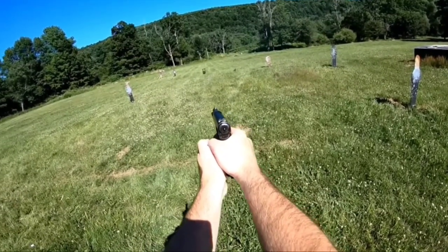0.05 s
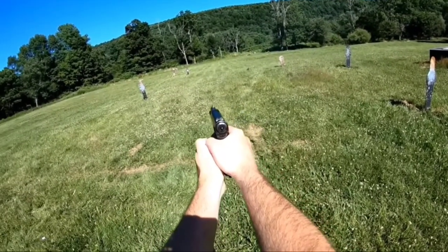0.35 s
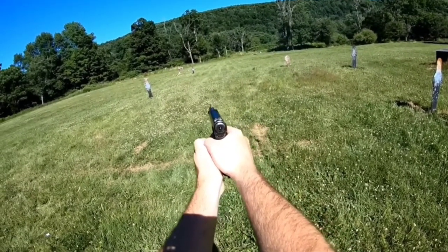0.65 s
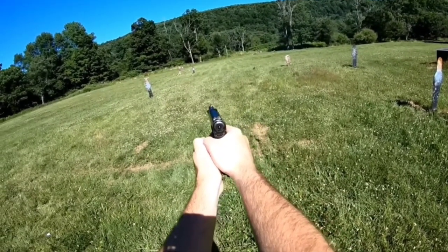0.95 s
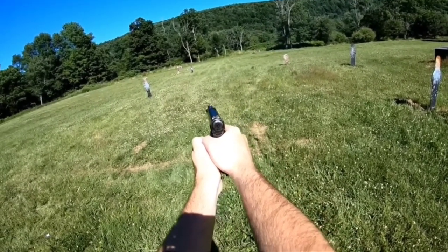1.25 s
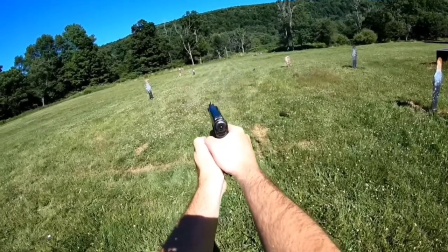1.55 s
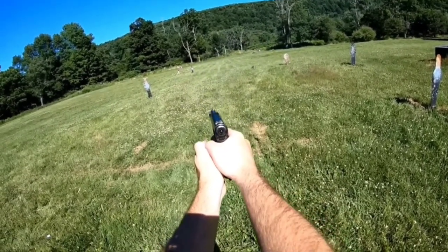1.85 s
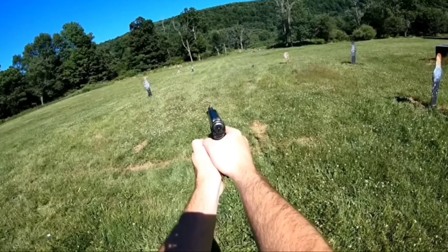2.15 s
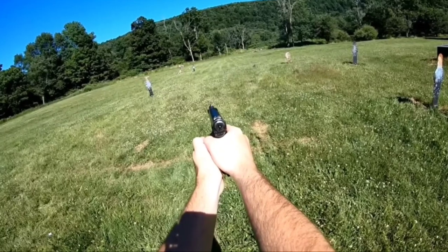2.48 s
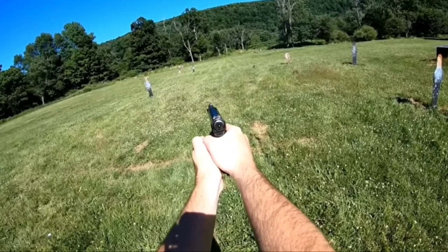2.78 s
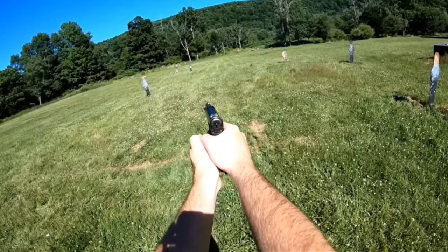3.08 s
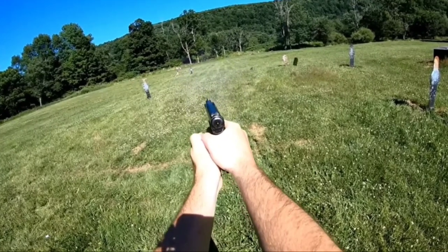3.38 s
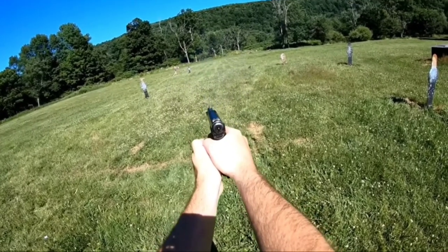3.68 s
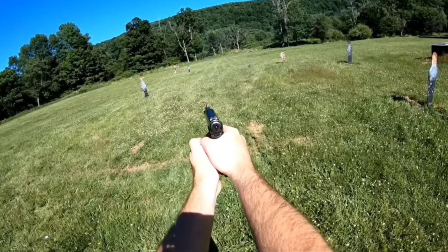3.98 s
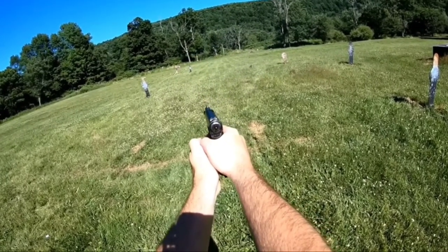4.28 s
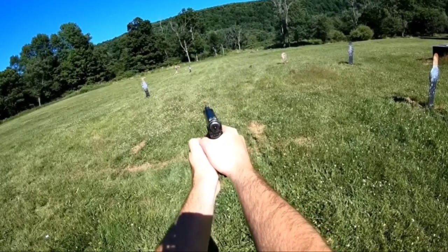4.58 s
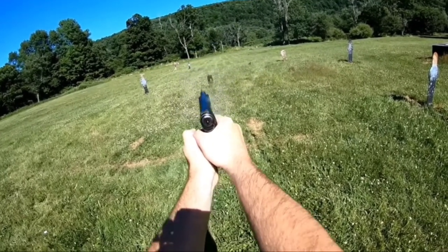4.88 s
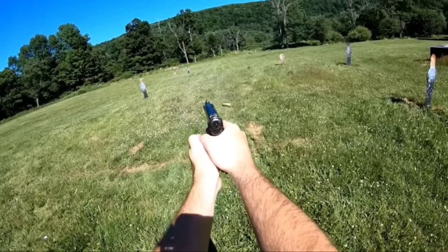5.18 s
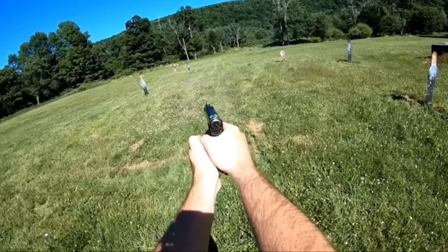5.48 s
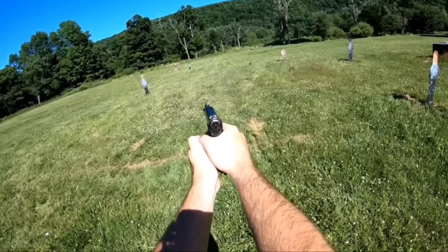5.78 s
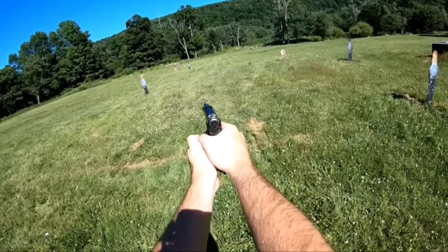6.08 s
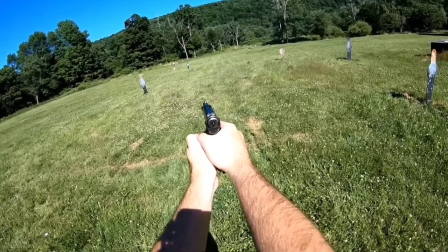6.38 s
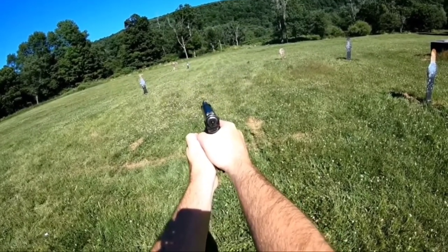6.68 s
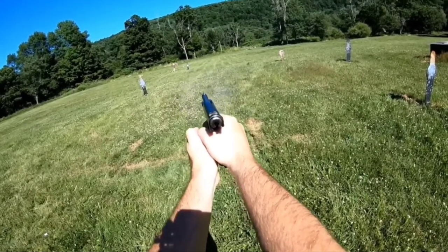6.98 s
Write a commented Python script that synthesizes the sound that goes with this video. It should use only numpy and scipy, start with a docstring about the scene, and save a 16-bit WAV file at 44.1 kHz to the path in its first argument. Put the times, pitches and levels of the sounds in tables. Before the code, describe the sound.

After a brief metallic rattle, a close handgun fires four evenly spaced, echoing shots outdoors, two of them ringing a steel target.

```python
"""Pistol shots in a field

Four shots in a mown field ringed by woods, heard from the shooter's head. A bright metallic rattle
comes first; each blast overloads the microphone, the slide cycles, and field and trees echo. Bullets
kick the soil and two clang on a steel plate. Gain control ducks at every shot and lets the echoes, the
breeze and a far engine swell back."""
import sys
import numpy as np
from scipy import signal
from scipy.fft import rfft, irfft
from scipy.io import wavfile
from scipy.ndimage import uniform_filter1d, minimum_filter1d

SR = 44100
rng = np.random.default_rng(int(sys.argv[2]) if len(sys.argv) > 2 else 0)


def output_pcm(signal):
    """Save a mono or channel-first signal as 16-bit PCM at the path in sys.argv[1].

    Samples are clipped to [-1, 1] before scaling.
    """
    pcm = np.clip(np.atleast_2d(signal).T, -1, 1) * 32767
    wavfile.write(sys.argv[1], SR, np.round(pcm).astype(np.int16))


N = 319725
OVERLOAD_DB = 22


def amp(db):
    return 10 ** (np.asarray(db) / 20)


def unit_rms(x):
    return x / np.sqrt(np.mean(x ** 2) + 1e-20)


def seconds(length_s):
    return np.arange(int(length_s * SR)) / SR


def add(mix, start_s, sound):
    part = mix[max(round(start_s * SR), 0):][:len(sound)]
    part += sound[:len(part)]


def colour(x, spectrum):
    """Filters x by (Hz, dB) points; the result has rms 1."""
    hz, db = np.transpose(spectrum)
    bin_hz = np.fft.rfftfreq(len(x), 1 / SR)
    gain = amp(np.interp(np.log(bin_hz + 1), np.log(hz), db))
    return unit_rms(irfft(rfft(x) * gain, len(x)))


def noise(spectrum, t):
    return colour(rng.standard_normal(len(t)), spectrum)


def burst(spectrum, decay_s):
    t = seconds(1)
    return noise(spectrum, t) * np.exp(-t / decay_s)


def knocks(t, depth_db):
    """A level that jumps every few milliseconds, as loose parts knock."""
    jitter = unit_rms(uniform_filter1d(rng.standard_normal(len(t)), size=90))
    return unit_rms(amp(depth_db * jitter))


# Each row: frequency in Hz, relative level in dB.
WIND_SPECTRUM = [(5, -8.5), (28, 6), (55, -4.5), (82, -1), (120, -9.5), (170, -21), (300, -27),
                 (700, -61.5)]
# Each row: peak time in seconds, boost in dB.
WIND_GUSTS = [(3.149, 5.5), (4.8, 4), (6.65, 6.5)]

def wind(t, buffet, start_db=-38, freshen_db_per_s=0.79, gust_width_s=0.34, buffet_db=4):
    """A freshening, gusty breeze buffets the microphone."""
    gusts_db = sum(db * np.exp(-((t - peak_s) / gust_width_s) ** 2) for peak_s, db in WIND_GUSTS)
    level_db = start_db + freshen_db_per_s * t + gusts_db + buffet_db * buffet
    return amp(level_db) * noise(WIND_SPECTRUM, t)


# Each row: frequency in Hz, relative level in dB.
WOODS_SPECTRUM = [(100, -20.5), (180, -4.5), (300, -4.5), (550, 2), (950, 2), (1400, -2), (2000, -9.5),
                  (3000, -17), (4500, -26.5), (7000, -35), (11000, -40), (15500, -43)]

def woods(t, sway, level_db=-37.5, sway_db=0.5):
    """A near-steady wash from the woods."""
    return amp(level_db + sway_db * sway) * noise(WOODS_SPECTRUM, t)


def engine(t, sway, drift, start_hz=305.4, sag_hz_per_s=5, level_db=-43.5, nearest_s=5.26, pass_s=1.0):
    """A far engine drones on two harmonics, slows steadily and is loudest as it passes."""
    hz = (start_hz - sag_hz_per_s * t) * (1 + 0.012 * drift)
    phase = 2 * np.pi * np.cumsum(hz) / SR
    drone = np.sin(phase) + amp(-3) * np.sin(2 * phase)
    relative_distance = np.hypot(1, (t - nearest_s) / pass_s)
    return amp(level_db + 2 * sway) / relative_distance * drone


# Each row: frequency in Hz, relative level in dB.
RATTLE_SPECTRUM = [(500, -5), (1700, -2.5), (4500, 4), (5350, -6), (5680, 10.5), (6000, 0), (7200, 3.5),
                   (8700, -2), (9000, -2), (10400, -9), (11500, -17), (15500, -18)]
# Each row: start in seconds, level in dB, rise in seconds, decay in seconds.
METAL_RATTLES = [(0.0, -41.5, .003, 0.16), (0.049, -38, .003, 0.055), (.132, -31.5, .012, 0.04),
                 (.528, -51, .006, 0.02), (.868, -55, .008, 0.019), (.985, -46, .02, 0.045)]

def metal_rattles(mix):
    """A bright metallic rattle and its fading echo open the scene."""
    t = seconds(1)
    for start_s, db, rise_s, decay_s in METAL_RATTLES:
        rattle = burst(RATTLE_SPECTRUM, decay_s) * knocks(t, depth_db=3)
        add(mix, start_s, amp(db) * np.minimum(t / rise_s, 1) * rattle)


# Each row: frequency in Hz, relative level in dB.
CRACK_SPECTRUM = [(200, -13.5), (700, -3.5), (1400, -11), (2400, -4.5), (2900, 1), (3300, -9.5),
                  (3850, 2.5), (4800, -10.5), (5700, -2), (7000, -7.5), (9500, -7), (15500, -14)]
# Reflections off hands, arms and chest. Each row: delay in seconds, relative height, width in seconds.
BODY_SLAPS = [(.0041, 0.86, 0.000075), (.0051, 1, 0.000032), (.0058, .4, .00004), (.0075, 0.81, 0.00006)]

def blast(crack_db, decay_s, slap_db, bounce_s, leak_hz=0.62):
    """Muzzle crack with its body and ground reflections, in units of the overload point."""
    t = seconds(1.8)
    crack = amp(crack_db) * noise(CRACK_SPECTRUM, t) * np.exp(-t / decay_s)
    slaps = sum(height * np.exp(-((t - at_s) / width_s) ** 2) for at_s, height, width_s in BODY_SLAPS)
    ground = 0.78 * np.exp(-((t - bounce_s) / 0.00042) ** 2)
    # The microphone is pinned to one side, then swings back far below the audible range.
    swing = -7.4 * np.exp(-t / 0.026) * np.sin(np.pi * (0.031 - t) / 0.128)
    pinned = 1.083 * np.tanh(np.minimum(swing, 0)) + np.maximum(swing, 0)
    pinned *= np.minimum(t / 0.0021, 1)
    leak = signal.butter(1, leak_hz, "high", fs=SR)
    return crack + amp(slap_db) * slaps + ground + signal.lfilter(*leak, pinned)


# Each row: frequency in Hz, relative level in dB.
SLIDE_SPECTRUM = [(100, 11.5), (400, 0), (1200, -70.5), (3000, 7.5), (7000, 7), (10000, 6.5), (15500, -27)]

def slide(clack_db=5, clack_s=0.028, rattle_db=-7, rattle_s=0.026, rattle_decay_s=0.068):
    """The slide slams home and its parts rattle on."""
    t = seconds(0.65)
    clack = amp(clack_db) * np.exp(-(t - clack_s) / 0.0025) * (t > clack_s)
    rattle = amp(rattle_db) * knocks(t, depth_db=2.5) * np.exp(-abs(t - rattle_s) / rattle_decay_s)
    rattle *= np.interp(t, [0.01, 0.024, rattle_s], [0, 0.15, 1])
    return noise(SLIDE_SPECTRUM, t) * (clack + rattle)


# Each row: start in seconds, crack level in dB over overload, crack decay in seconds,
# body slap gain in dB, ground bounce delay in seconds, slide gain in dB.
PISTOL_SHOTS = [(1.3709, 19, 0.0014, 9, 0.0092, -1.5), (3.2429, 27, 0.00082, -2, 0.0095, 0),
                (4.973, 21, 0.00084, -5, 0.00877, -1), (6.8737, 18.5, 0.00098, -1.5, 0.0095, -1)]

def pistol(mix, echo):
    """Each shot blasts, cycles the slide and raises the same echo."""
    for start_s, crack_db, decay_s, slap_db, bounce_s, slide_db in PISTOL_SHOTS:
        add(mix, start_s, amp(OVERLOAD_DB) * blast(crack_db, decay_s, slap_db, bounce_s))
        add(mix, start_s, amp(slide_db) * slide())
        add(mix, start_s, echo)


# Each row: frequency in Hz, relative level in dB.
SCATTER_SPECTRUM = [(60, -28.5), (200, -26.5), (330, -12.5), (480, -4.5), (900, 2), (1300, 2.5),
                    (1900, -6.5), (3600, -11), (7000, -17), (10000, -21.5), (12000, -30), (16000, -25)]
# Grass underfoot, slope, far meadow, edge of the woods, hillside.
# Each row: peak delay in seconds, level in dB, rise in dB per second, fade in dB per second.
TERRAIN = [(.029, -1, 1000, 602), (.063, 1.2, 800, 189), (.24, -20.5, 60, 30), (.345, -12.5, 280, 38),
           (.5, -14.5, 150, 33)]

def scatter(t, grain_db=2.5, ridge_s=0.9, ridge_db_per_s=25):
    """Stretches of land return grainy noise and their powers add; little comes from beyond the ridge."""
    grains = rng.standard_normal(len(t)) * amp(grain_db * np.minimum(rng.exponential(1, len(t)), 5))
    power = sum(amp(db + np.minimum(rise * (t - peak_s), fade * (peak_s - t))) ** 2
                for peak_s, db, rise, fade in TERRAIN)
    ridge_shadow = amp(-ridge_db_per_s * np.maximum(t - ridge_s, 0))
    return colour(grains, SCATTER_SPECTRUM) * np.sqrt(power) * ridge_shadow


def trunks(count=6, near_s=0.38, far_s=0.98, near_db=-2.5, fade_db_per_s=26, centre_hz=2200):
    """Reflector rows for randomly placed trunks; the farther, the fainter."""
    place, tone = rng.random((count, 2)).T
    depth_s = (far_s - near_s) * (np.arange(count) + place) / count
    return list(zip(near_s + depth_s, near_db - fade_db_per_s * depth_s, centre_hz * 2 ** (tone - 0.5)))


# Plates and the tree line. Each row: delay in seconds, level in dB, centre frequency in Hz.
FIELD_REFLECTORS = [(.0615, 0, 2400), (.0885, 1, 1800), (.1545, 9, 2900), (.1738, -3, 3300),
                    (.474, -1, 800), (.4875, 2, 900), (.612, -4, 1200)]

def field_echo(patch_db=1.82, air_db_per_s=26):
    """The landscape returns a shot as scatter and a few sharp slaps."""
    t = seconds(1.5)
    echo = scatter(t)
    for delay_s, db, centre_hz in FIELD_REFLECTORS + trunks():
        cycles = (t - delay_s) * centre_hz
        echo += amp(db) * np.cos(2 * np.pi * cycles) * np.exp(-2 * cycles ** 2)
    hz, path_s, bins = signal.stft(echo, SR, nperseg=256)
    # Each clump of trees returns its own patch of the spectrum.
    patches = uniform_filter1d(rng.standard_normal(bins.shape), size=4, axis=0)
    patches = unit_rms(uniform_filter1d(patches, size=3, axis=1))
    air_loss_db = air_db_per_s * path_s * (hz[:, None] / 10000) ** 1.1
    return signal.istft(bins * amp(patch_db * patches - air_loss_db), nperseg=256)[1]


# Lead striking soil or steel. Each row: frequency in Hz, relative level in dB.
SPLASH_SPECTRUM = [(300, -39), (1600, -22), (2500, -5), (5000, -2), (8000, -3.5), (11000, -8), (15500, -15)]
# Each row: start in seconds, level in dB, decay in seconds.
SOIL_HITS = [(1.5914, -16.5, .004), (3.469, -21, .002), (5.185, -20, .002), (7.0572, -12.5, 0.0033)]

def soil_hits(mix):
    """Bullets and fragments kick the soil."""
    for start_s, db, decay_s in SOIL_HITS:
        add(mix, start_s, amp(db) * burst(SPLASH_SPECTRUM, decay_s))


# Each row: frequency in Hz, T60 in seconds, level in dB for a centre strike, level in dB for a rim strike.
PLATE_MODES = [(1740, 0.44, -17, -31), (2230, 0.72, -14.5, -17), (2490, 0.35, -9, -2.5),
               (2615, 0.43, -21, 0.5), (2860, 0.26, -8, 1), (3130, 0.28, -5, -21), (2940, 0.34, -24, -11),
               (3541, 0.22, -5, -18), (3730, 0.18, -16, -4), (4160, 0.27, -25, -19), (4340, .25, -25, -15),
               (4350, .25, -24, -15), (4360, 0.23, -14, -14), (4540, 0.36, -24, -10), (4978, 0.13, -20, 5),
               (5300, 0.22, -13, -0.5), (5670, 0.16, 6, -9), (5824, 0.19, -6, -12), (6000, 0.51, -15, -8),
               (6487, 0.33, -27, -11), (7750, .2, -27, -27), (9618, 0.52, -25, -21), (9860, 0.099, -8, -4),
               (11850, .2, -29, -13)]

def plate_ring(spot, twin_gain=0.35, split_hz=38, clank_db=-18, clank_t60_s=0.15):
    """The strike spot sets the level of each steel mode; a weaker twin makes the mode beat."""
    t, ring = seconds(1), 0
    for hz, t60_s, centre_db, rim_db in PLATE_MODES:
        phase, twin_phase, split = rng.random(3)
        twin_hz = hz + split_hz * (2 * split - 1)
        mode = np.sin(2 * np.pi * (hz * t + phase))
        twin = twin_gain * np.sin(2 * np.pi * (twin_hz * t + twin_phase))
        ring += amp(centre_db + spot * (rim_db - centre_db) - 60 * t / t60_s) * (mode + twin)
    # Short-lived modes of plate and hanger make the clank.
    for place, phase in rng.random((40, 2)):
        hz = 2200 * 5 ** place
        ring += amp(clank_db - 60 * t / clank_t60_s) * np.sin(2 * np.pi * (hz * t + phase))
    return ring


# Each row: start in seconds, ring gain in dB, splash gain in dB, strike spot from 0 (centre) to 1 (rim).
PLATE_HITS = [(3.4250, -7.5, 3.5, 0.036), (5.1564, -7.5, 2.5, 0.75)]

def plate_hits(mix, echo, echo_db=-11):
    """Lead splashes on the plate, the steel rings, and the edge of the woods returns the clang."""
    delay_s = np.arange(len(echo)) / SR
    woods_edge = echo * (delay_s > 0.2) * np.exp(-delay_s / 0.11)
    woods_edge /= np.linalg.norm(woods_edge)
    for start_s, ring_db, splash_db, spot in PLATE_HITS:
        ring = amp(ring_db) * plate_ring(spot)
        tick = burst(SPLASH_SPECTRUM, decay_s=0.0012)
        shimmer = amp(-15) * burst(SPLASH_SPECTRUM, decay_s=0.03)
        clang = ring + amp(splash_db) * (tick + shimmer)
        add(mix, start_s, clang)
        carry = amp(echo_db - 10 * spot)  # a square hit carries farthest
        add(mix, start_s, carry * signal.fftconvolve(clang, woods_edge))


def scene(port_db=-31):
    """Shots, steel and rattles in the open air, nearly the same in both ears."""
    t = np.arange(N) / SR
    slow_spectrum = [(1, 0), (5, -3), (20, -28), (60, -100)]
    buffet, sway, drift = (noise(slow_spectrum, t) for _ in range(3))
    mix = wind(t, buffet) + woods(t, sway) + engine(t, sway, drift)
    echo = field_echo()
    pistol(mix, echo)
    plate_hits(mix, echo)
    soil_hits(mix)
    metal_rattles(mix)
    # The microphone housing colours its two ports a little differently.
    port_taps = unit_rms(np.diff(rng.standard_normal(65))) / np.sqrt(64)
    side = amp(port_db) * signal.oaconvolve(mix, port_taps)[:N]
    return np.array([mix + side, mix - side])


def record(dry, limit_db=-2, recovery_db_per_s=22, ahead_s=0.01, cutoff_hz=15700):
    """The microphone clips; gain control ducks just ahead of each peak and recovers; then a low-pass."""
    clipped = np.clip(dry, -amp(OVERLOAD_DB), amp(OVERLOAD_DB))
    over_db = np.maximum(20 * np.log10(abs(clipped).max(0) + 1e-9) - limit_db, 0)
    ramp_db = recovery_db_per_s * np.arange(N) / SR
    gain_db = ramp_db - np.maximum.accumulate(over_db + ramp_db)
    gain_db = minimum_filter1d(gain_db, size=2 * int(ahead_s * SR) + 1)
    gain_db = uniform_filter1d(gain_db, size=400)
    lowpass = signal.firwin(301, cutoff_hz, window=("kaiser", 9), fs=SR)
    return signal.oaconvolve(clipped * amp(gain_db), lowpass[None], "same", axes=1)


dry = scene()
out = record(dry)
output_pcm(out)
```